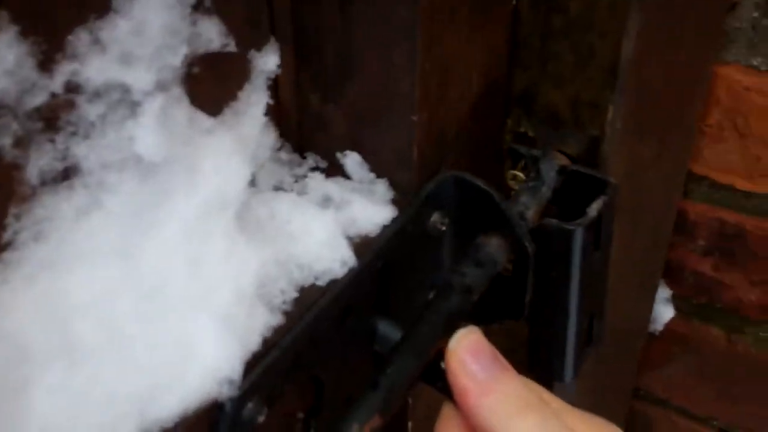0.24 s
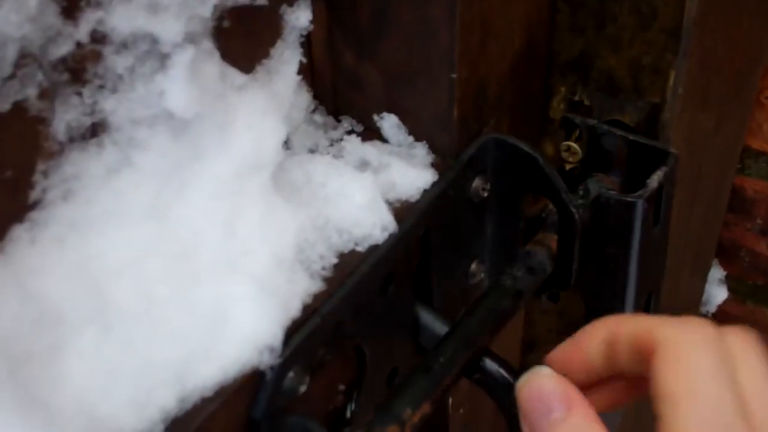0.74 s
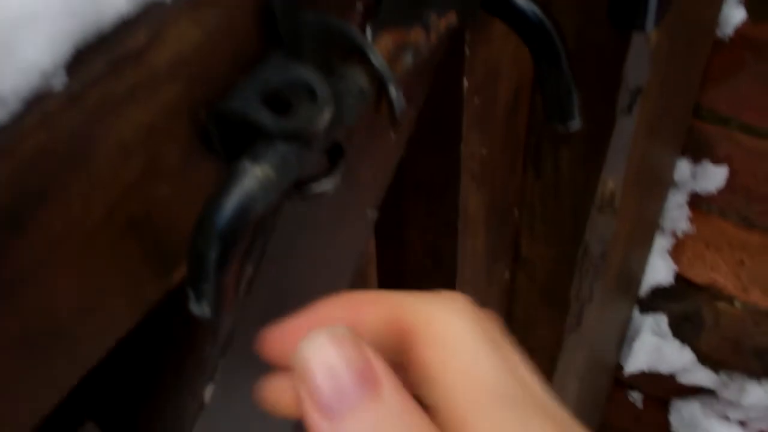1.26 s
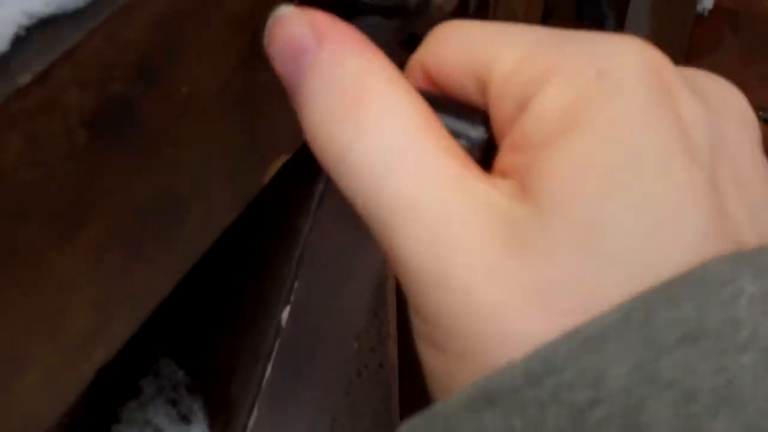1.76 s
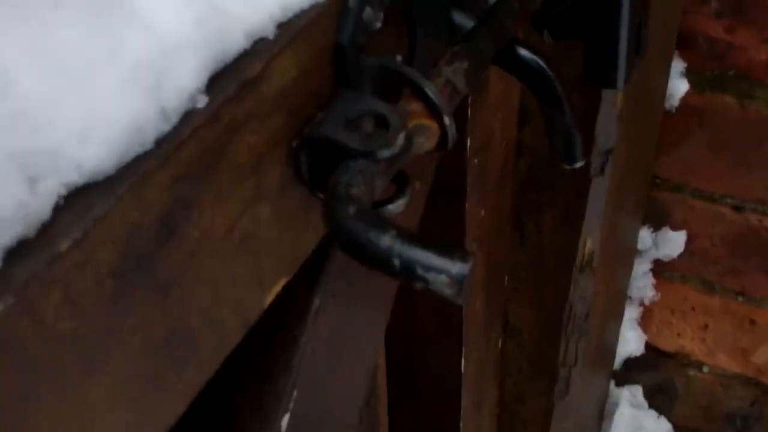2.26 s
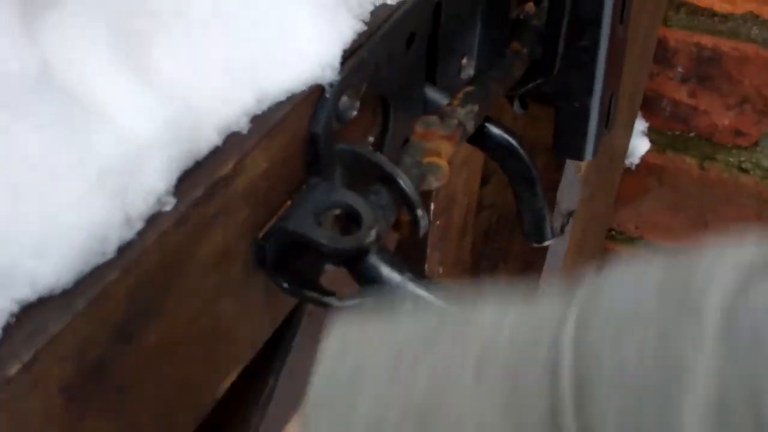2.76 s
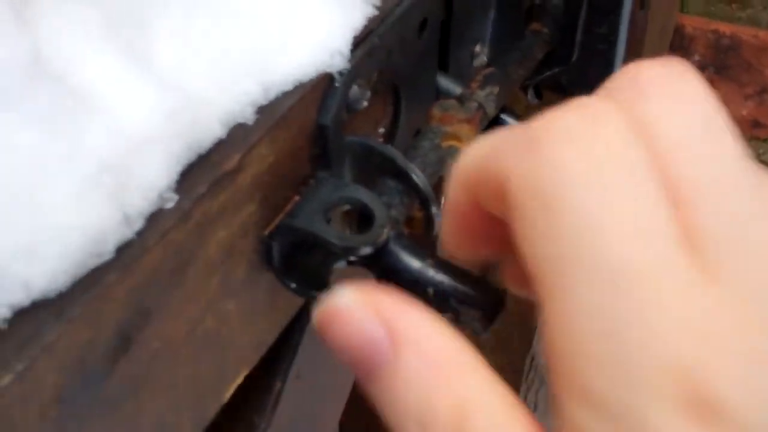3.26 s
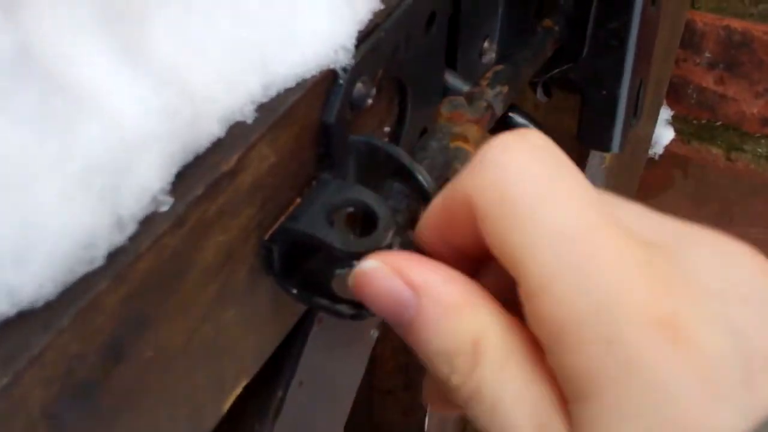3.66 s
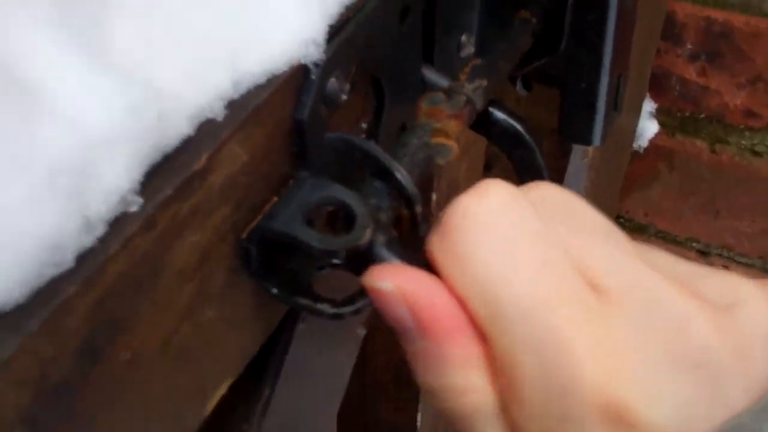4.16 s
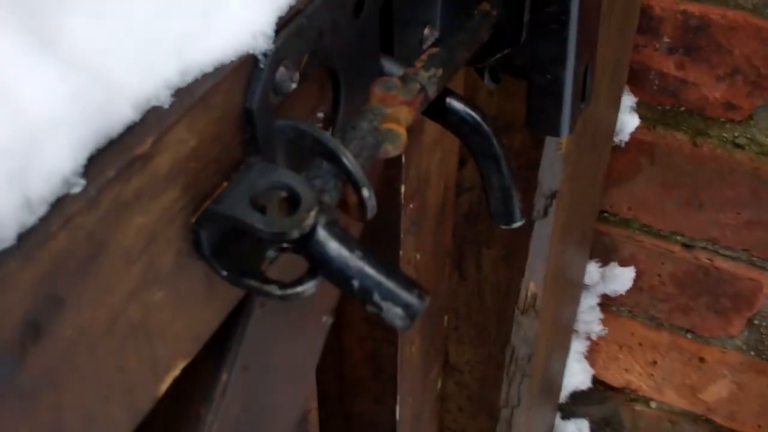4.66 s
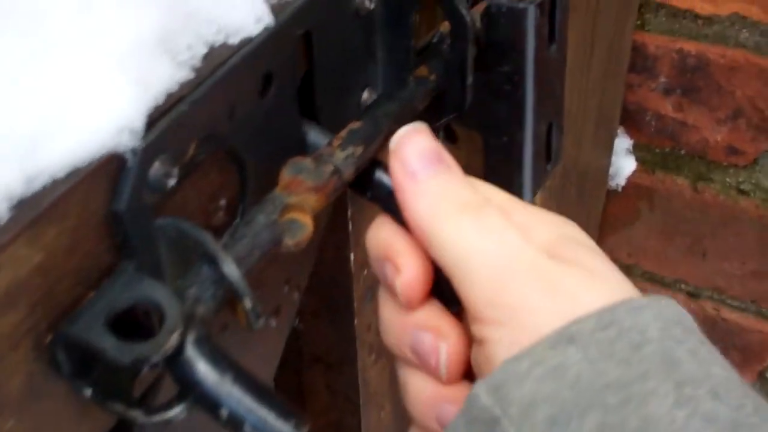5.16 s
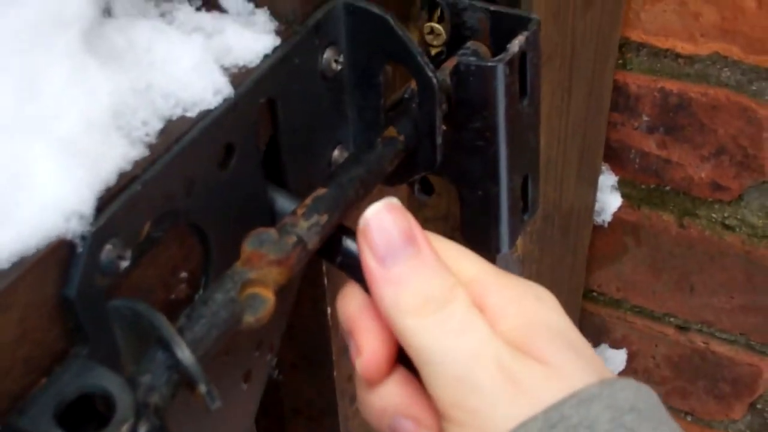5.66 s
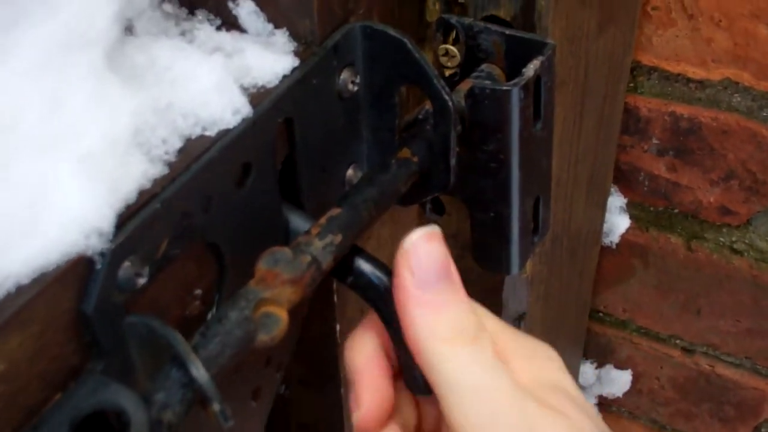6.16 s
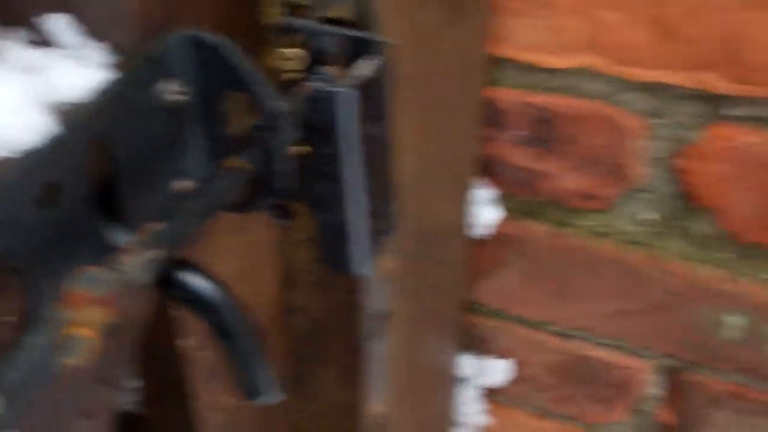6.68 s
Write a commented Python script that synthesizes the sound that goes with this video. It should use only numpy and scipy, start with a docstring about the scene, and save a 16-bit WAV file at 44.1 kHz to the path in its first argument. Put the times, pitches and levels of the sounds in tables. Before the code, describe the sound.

Sharp metal knocks, short gritty bolt scrapes and a dull gate drag, very close and dry outdoors, with faint traffic wash pumping behind.

```python
"""A hand works the iron latch and slide bolt of a wooden gate, close by, over a distant traffic hum.
From the start iron knocks shake plate and boards (decaying modes), with bolt scrapes between (dense slips).
The hum (shaped noise) drops at once, swells back, and repeats this at listed times; faint whistles come and go.
The gate bumps its post from 0.2 s on and drags with dull catches from 1.2 to 1.6 s (slips over a noise rush).
The free bolt rings thinly near 1.7, 2.5 and 6.2 s (damped sines); knocks and scrapes go on to 6.9 s."""
import sys
import numpy as np
from scipy import signal
from scipy.io import wavfile
from scipy.ndimage import uniform_filter1d

SR = 44100
rng = np.random.default_rng(int(sys.argv[2]) if len(sys.argv) > 2 else 0)


def master_out(mix):
    """Clip the mix to full scale and print it as 16-bit PCM to the path in sys.argv[1]."""
    frames = np.transpose(np.atleast_2d(mix))
    ceiling = np.clip(frames, -1, 1)
    pcm = np.round(ceiling * 32767).astype(np.int16)
    wavfile.write(sys.argv[1], SR, pcm)


N = 305171


def gain_of(db):
    """Decibels to amplitude."""
    return 10 ** (np.asarray(db) / 20)


def evened(x):
    """Scales to rms 1."""
    return x / np.sqrt(np.mean(x ** 2) + 1e-20)


def peaked(x):
    """Scales to peak 1."""
    return x / abs(x).max()


def read(points, hz):
    """Interpolates a spectrum table on a log frequency axis."""
    point_hz, value = np.transpose(points)
    return np.interp(np.log(hz + 1), np.log(point_hz + 1), value)


def add(mix, start_s, sound, pan_db):
    """Adds a two-channel sound at start_s, the left raised against the right by pan_db."""
    part = mix[:, round(start_s * SR):][:, :sound.shape[1]]
    panned = sound * gain_of([[pan_db / 2], [-pan_db / 2]])
    part += panned[:, :part.shape[1]]


# Left-right likeness of noise. Each row: frequency in Hz, correlation 0 to 1.
LIKENESS = [(60, 0.59), (130, 1), (280, 1), (590, 0.85), (1260, 0.78), (2700, 0.27), (5790, 0.45),
            (12400, 0.02)]
# Left-right balance of noise. Each row: frequency in Hz, left against right in dB.
BALANCE = [(60, 4.5), (110, 1), (200, 4.5), (350, 3), (640, 4), (1160, 0.5), (2100, 3), (3790, 4.5),
           (6860, 5.5), (12400, 4)]


def noise(spectrum, patchy_db, size):
    """Random short-time spectra with drifting patches, partly alike at two microphones, rms 1."""
    frames, hz = 4 * N // size + 5, np.fft.rfftfreq(size, 1 / SR)
    a, b, c, d, patches = rng.standard_normal((frames, len(hz), 5)).T
    patches = uniform_filter1d(patches, 10, 0)
    patches = evened(uniform_filter1d(patches, 12, 1))
    same = np.clip(read(LIKENESS, hz), -1, 1)[:, None]
    left = a + 1j * b
    right = same * left + np.sqrt(1 - same ** 2) * (c + 1j * d)
    ear_db = np.array([.5, -.5])[:, None, None] * read(BALANCE, hz)[:, None]
    level_db = read(spectrum, hz)[:, None] + patchy_db * patches + ear_db
    bins = np.array([left, right]) * gain_of(level_db)
    return evened(signal.istft(bins, nperseg=size, noverlap=size * 3 // 4)[1][:, :N])


# Fuzzy background whistles. Each row: start in seconds, end in seconds, centre in Hz, width in Hz,
# level against the wash in dB.
WHISTLES = [(0.95, 1.25, 4680, 110, -11), (0.952, 1.198, 5570, 120, -14), (2.1, 3.8, 1820, 170, -8),
            (4.399, 5.08, 1740, 120, -15), (4.55, 5.08, 620, 40, -16), (6.35, 6.8, 640, 40, -16)]


def whistles():
    """Narrow resonances filter noise into bands that fade in and out."""
    out = np.zeros((2, N))
    for start_s, end_s, hz, width_hz, db in WHISTLES:
        hiss = rng.standard_normal((3, N))[:, :round((end_s - start_s) * SR)]
        shared = hiss[:2] + 2.6 * hiss[2]
        band = signal.lfilter(*signal.iirpeak(hz, hz / width_hz, SR), shared)
        fade = signal.windows.tukey(band.shape[1], .3)
        add(out, start_s, gain_of(db) * evened(band) * fade, 4)
    return out


# Dips of the traffic hum. Each row: start in seconds, depth of the wash in dB, depth of the rumble in dB.
DIPS = [(0, 67, 20), (.2, 23, 7.5), (.46, 18, 8), (.54, 28, 20), (0.656, 25, 18.5), (.945, 7, -7),
        (1.608, 15, 6), (1.769, 23.5, 12), (2.49, 31.5, 24), (2.821, 20, 12), (3.36, 6, 1),
        (3.766, 11, 1.5), (4.2, 15, -0.5), (4.307, 23, 7), (5.096, 39.5, 29.5), (5.36, 18.5, 15.5),
        (5.47, 31.5, 21), (5.59, 24.5, 27), (5.72, 38.5, 38), (5.87, 29.5, 22), (5.99, 36, 23.5),
        (6.091, 18, 24), (6.277, 29.5, 24.5)]
SINK_S, SAG_S, SAG_SHARE = 0.0096, 0.074, 0.26  # quick drop, slower sag
HOLD_S, SWELL_S = 0.13, 0.12


def dips():
    """Exponential drop, hold and recovery in dB; the deepest dip rules."""
    t, depth = np.arange(N) / SR, np.zeros((2, N))
    for start_s, *depth_db in DIPS:
        since = np.maximum(t - start_s, 0)
        drop = (1 - SAG_SHARE) * np.exp(-since / SINK_S)
        sag = SAG_SHARE * np.exp(-since / SAG_S)
        swell = np.exp(-np.maximum(since - HOLD_S, 0) / SWELL_S)
        depth = np.maximum(depth, np.outer(depth_db, (1 - drop - sag) * swell))
    return -depth


# Spectrum of the distant wash. Each row: frequency in Hz, density in dB per Hz.
WASH = [(53, -39.5), (90, -7.5), (128, -1), (276, -7.5), (393, -3.5), (474, -7.5), (608, -10.5),
        (1230, -14.5), (1790, -13.5), (2490, -15), (4190, -18.5), (6090, -25), (7980, -25), (10900, -31.5),
        (12900, -45), (16700, -67.5), (22000, -120)]
# Spectrum of the distant rumble. Each row: frequency in Hz, density in dB per Hz.
RUMBLE = [(15, -47.5), (25, -7.5), (41, -4.5), (54, 1.5), (65, -2.5), (81, -16), (100, -7), (130, -39),
          (220, -120)]
WASH_DB, RUMBLE_DB = -50, -53.5  # before dips
HISS_DB = -85  # floor under the wash
HUM_HZ, HUM_SHARE = 55.8, .6  # steady hum, amplitude against rumble rms


def street():
    """Distant traffic: wash with whistles, and rumble with a steady hum, both under the dips."""
    wash_dip_db, rumble_dip_db = dips()
    hum = HUM_SHARE * np.sin(2 * np.pi * HUM_HZ * np.arange(N) / SR) * gain_of([[2], [-2]])
    wash_gain = np.hypot(gain_of(WASH_DB + wash_dip_db), gain_of(HISS_DB))
    wash = wash_gain * (noise(WASH, 1.6, size=1024) + whistles())
    rumble = noise(RUMBLE, 0.38, size=8192) + hum
    return wash + gain_of(RUMBLE_DB + rumble_dip_db) * rumble


def wall(x):
    """The brick wall and boards throw back a short dull scatter: decaying low-passed noise taps."""
    t = np.arange(5000) / SR
    taps = rng.standard_normal((2, len(t))) * gain_of(-60 * t / 0.18) * (t > .003)
    taps = signal.lfilter(*signal.butter(2, 2500, fs=SR), taps)
    return signal.fftconvolve(x, taps / np.linalg.norm(taps[0]), axes=1)[:, :N]


# The gate bumps its post. Each row: start in seconds, level in dB, pitch in Hz, t60 in seconds.
THUDS = [(0.219, -38, 87, 0.078), (2.421, -13.5, 131, 0.028), (2.797, -33.5, 110, 0.18),
         (3.35, -38, 152, 0.085), (4.16, -37, 179, .1)]


def thuds():
    """A low push through the gate: one decaying sine per bump."""
    out, t = np.zeros((2, N)), np.arange(4000) / SR
    for start_s, db, hz, t60_s in THUDS:
        push = -gain_of(db - 60 * t / t60_s) * np.sin(2 * np.pi * hz * t)
        add(out, start_s, push * np.ones((2, 1)), 4.5)
    return out


# The dragging gate catches. Each row: start in seconds, peak in dB, pitch in Hz.
CATCHES = [(1.219, -41, 466), (1.343, -52, 300), (1.356, -31, 410), (1.374, -28, 840), (1.388, -36.5, 296),
           (1.4, -30.5, 700), (1.432, -27, 697), (1.449, -27.5, 880), (1.465, -39, 738), (1.474, -31, 479),
           (1.488, -39.5, 303), (1.504, -32, 855)]
CATCH_T60_S = 0.0087


def catches():
    """Short dull pulses through the boards: three inharmonic decaying sines each."""
    out, t = np.zeros((2, N)), np.arange(1500) / SR
    for start_s, db, hz in CATCHES:
        tones = np.sin(2 * np.pi * hz * t)
        tones += 0.5 * np.sin(2 * np.pi * 0.41 * hz * t)
        tones += 0.3 * np.sin(2 * np.pi * 2.5 * hz * t)
        pulse = peaked(gain_of(-60 * t / CATCH_T60_S) * tones)
        add(out, start_s, gain_of(db) * pulse * np.ones((2, 1)), 4.5)
    return out


SCATTER_DB = 1.6  # spread per unit of chance


def ring(modes, chance, side):
    """Decaying modes; the contact point scatters their strength, and two microphones hear other phases."""
    t, (pan_db, scatter_rad) = np.arange(4000) / SR, side
    hz, db, t60_s = np.transpose(modes)[:, :, None]
    strength, detune, turn = chance[:3 * len(modes)].reshape(3, -1, 1)
    onset = 1 - np.exp(-t * hz * 0.72)
    decay = gain_of(db + SCATTER_DB * strength - 60 * t / t60_s) * onset
    phase = 2 * np.pi * hz * (1 + 0.021 * detune) * t
    ears = []
    for ear in (1, -1):
        tones = decay * np.sin(phase + ear * scatter_rad * turn)
        ears.append(gain_of(ear * pan_db / 2) * tones.sum(0))
    return np.array(ears)


# Modes of wood and iron: boards, low plate, plate, treble, bright edge.
# Each row: frequency in Hz, relative level in dB, nominal t60 in seconds.
BOARDS = [(165.5, -9, 0.073), (194.6, -6.5, 0.1), (263.6, 5.5, 0.025), (348, 1.5, 0.034),
          (420.7, -2, 0.034), (560, 7, 0.015)]
LOW_PLATE = [(842.5, -2.8, 0.013), (984.6, 1, 0.016), (1145, 0.89, 0.015), (1385, -1.6, 0.012)]
PLATE = [(1585, -11, 0.006), (1756, -12, 0.01), (2023, -3.5, 0.0068), (2520, -5, 0.0048)]
TREBLE = [(2560, -0.5, 0.0094), (2880, -0.5, 0.012), (3290, -3, 0.014), (3985, -8, 0.013),
          (4320, 2.5, 0.0065), (4740, -2.5, 0.0086), (5120, 5.5, 0.0066), (5770, 5.5, 0.0054)]
EDGE = [(6500, 8, 0.0036), (7270, -0.5, 0.0047), (8250, 4, 0.0023), (9260, -6.5, 0.0051),
        (9850, -16.5, 0.0036)]
# Stereo of the five mode groups in that order. Each row: left against right in dB, phase scatter in radians.
SIDES = [(4, 0.059), (4.5, 0.2), (5, 0.2), (5.5, 0.28), (8, 0.94)]


def scrape(rows):
    """Dense small slips of uneven size excite the same iron and wood as the knocks."""
    s, *columns = np.transpose(rows)
    t = np.arange(s[0], s[-1], 1 / SR)
    db, boards_db, treble_db = (np.interp(t, s, column) for column in columns)
    out = np.zeros((2, len(t)))
    # the grip on the rust comes and goes
    grip = gain_of(1.4 * evened(uniform_filter1d(rng.standard_normal(len(t)), 250)))
    groups = ((LOW_PLATE, 0, 350, SIDES[1]), (PLATE, -5., 1500, SIDES[2]),
              (BOARDS, boards_db, 300, SIDES[0]), (TREBLE + EDGE, treble_db, 5000, SIDES[4]))
    for modes, group_db, slips_per_s, side in groups:
        struck = rng.random(len(t)) < slips_per_s / SR
        size = gain_of(1.5 * np.minimum(rng.exponential(1, len(t)), 4))
        slips = struck * size * rng.choice([-1, 1], len(t))
        pressed = np.array(modes) * [1, 1, .55]  # pressed parts ring shorter
        body = ring(pressed, 0.14 * rng.standard_normal(39), side)
        sound = signal.fftconvolve(body, (slips * grip)[None])[:, :len(t)]
        out += gain_of(db + group_db) * evened(sound)
    return s[0], out * signal.windows.tukey(len(t), .15)


# The gate drags open. Each row: time in seconds, slips in dB, boards against them in dB,
# treble against them in dB, rush in dB.
DRAG = [(1.2, -74, -5, -19, -53.5), (1.26, -52.5, -18, 0.5, -53.5), (1.33, -54.5, -15, 7.5, -45),
        (1.39, -59, 8, 10.5, -41.5), (1.46, -56.5, 11.5, 10, -38), (1.528, -42.5, 3, -1, -48.5),
        (1.599, -78.5, 8.5, -28, -52)]
# Spectrum of the drag's rush. Each row: frequency in Hz, density in dB per Hz.
RUSH = [(47, -36), (80, -12), (133, -8), (457, -1), (498, -3), (730, 1), (1350, -15), (6510, -19),
        (9960, -25), (12900, -37.5), (16700, -74.5), (22000, -120)]


def drag():
    """Slips on rust and wood over a patchy noise rush."""
    s, *slips, rush_db = np.transpose(DRAG)
    t = np.arange(N) / SR
    surge_db = 2.9 * evened(uniform_filter1d(rng.standard_normal(N), 220))  # it sticks and slips
    level_db = np.interp(t, s, rush_db, -120, -120) + surge_db
    out = gain_of(level_db) * noise(RUSH, 4.0, size=256)
    add(out, *scrape(np.transpose([s, *slips])), 0)
    return out


# Bolt scrapes, and short low rumbles through the boards. Each row: start in seconds, loudest in seconds, end in
# seconds, level in dB, # boards against it in dB, treble against it in dB.
SCRAPES = [(0, -0.002, 0.11, -65, 10.5, -2), (0.214, 0.215, .33, -75, 18.5, 1),
           (0.471, 0.507, .524, -40.5, -3, -27), (1.948, 2.024, 2.09, -55.5, 1, 1),
           (2.442, 2.459, 2.502, -29.5, -11.5, -2), (2.823, 2.835, 2.92, -76, 27.5, -17),
           (4.096, 4.177, 4.2, -59.5, 14, -0.5), (5.34, 5.347, 5.39, -63.5, 10, -15.5),
           (6.499, 6.623, 6.74, -58, -1.5, 4.5), (6.803, 6.846, 6.89, -46.5, 0, 6.5),
           (6.871, 6.914, 6.92, -45, 5.5, -0.5)]
RISE_DB, FALL_DB = -24, -23  # start and end against the loudest moment


def scrapes():
    """The bolt slides and the boards rumble briefly: slips swell to a loudest moment and fade."""
    out = np.zeros((2, N))
    for start_s, loudest_s, end_s, db, *colour in SCRAPES:
        rows = [(start_s, db + RISE_DB, *colour), (loudest_s, db, *colour), (end_s, db + FALL_DB, *colour)]
        add(out, *scrape(rows), 0)
    return out


# Free bolt rod modes. Each row: frequency in Hz, t60 in seconds.
ROD = [(5868, 0.17), (8247, .07), (9270, 0.15), (9415, 0.28), (11200, 0.084), (11680, .07)]
# Rings of the rod. Each row: struck in seconds, touched in seconds, change at the touch in dB,
# then the level of each rod mode in dB.
RINGS = [(1.73, 1.784, -38, -67, -69, -72, -41.5, -70, -64),
         (2.451, 2.497, -26, -32, -39, -42.5, -59, -56, -66),
         (6.243, 6.288, -16, -34.5, -33, -38.5, -60.5, -46.5, -49.5)]


def rod():
    """The free bolt rings in thin clean decaying sines until a touch damps it."""
    out, t = np.zeros((2, N)), np.arange(8000) / SR
    hz, t60_s = np.transpose(ROD)[:, :, None]
    for struck_s, touched_s, lost_db, *db in RINGS:
        touch_db = lost_db * np.clip((t - (touched_s - struck_s)) / 0.01, 0, 1)
        level = gain_of(np.array(db)[:, None] - 60 * t / t60_s + touch_db)
        ears = [(level * np.sin(2 * np.pi * hz * t + lag_rad)).sum(0) for lag_rad in (0, 1.2)]
        add(out, struck_s, np.array(ears), 6.5)
    return out


LEAD_DB, LEAD_OCTAVES = 11, .16


def led(modes, lead_hz):
    """Lifts the modes near the leading pitch with a Gaussian on a log frequency axis."""
    hz, db, t60_s = np.transpose(modes)
    octaves = np.log2(hz / lead_hz)
    return np.transpose([hz, db + LEAD_DB * np.exp(-(octaves / LEAD_OCTAVES) ** 2), t60_s])


# Knocks. Each row: start in seconds, blow strength in dB, then against it boards, low plate and treble in dB,
# nominal t60 of the gritty contact in seconds.
KNOCKS = [(0.0004, -31, -2.5, 0, 3.5, 0.018), (0.053, -65, 11, 8, 2, 0.022),
          (0.216, -40.5, 1.5, -1, -5, 0.025), (0.2491, -53.5, 3, 2, 2, 0.035),
          (0.272, -61, -1, -11, 7, .02), (0.281, -43, -9, -24, 2, 0.025), (0.3015, -63, -5, -6, 8, 0.061),
          (0.335, -61, -9, -4, 4, 0.03), (0.4441, -19, -11, 2, 4.5, 0.014),
          (0.4994, -38, -12.5, 0, 2, 0.015), (0.5071, -53, -19, 23, -16, .01),
          (0.5228, -32.5, -6, 9, 11.5, 0.028), (0.5257, -18.5, -15.5, -36, 3.5, 0.014),
          (0.5824, -61, 7, 12.5, -17, 0.08), (0.63, -45.5, -30, 11, -21, 0.047),
          (0.642, -33.5, -6, 2.5, 12.5, 0.019), (0.655, -37, -5, 5.5, -1, 0.025),
          (0.6908, -57, 3, 16, -11, 0.0093), (0.724, -69.5, 17, 13.5, -14, 0.0078),
          (0.7516, -77, 0, 18.5, -3, .017), (0.9305, -43, -11, 14, 5, 0.013),
          (0.933, -20, -9.5, -14, 5, 0.02), (1.114, -41, 4, 8, -2, 0.045), (1.2527, -37, 5, 4.5, -10, 0.03),
          (1.2642, -38.5, 3, -17, -13, 0.028), (1.526, -18.5, -23, 3, 2, 0.016),
          (1.596, -21, -10, -1, -9, 0.028), (1.6844, -41.5, 1, 5, -4, 0.075),
          (1.734, -22, -5, 1.5, -4.5, 0.038), (1.7468, -16, -17, -8.5, -1, 0.0099),
          (1.7896, -37, 2, 1, -3.5, 0.0085), (1.9215, -46, 5, 3.5, -16, 0.047),
          (2.418, -32.5, -11.5, -7.5, 3, .02), (2.423, -17.5, -4.5, 0, -3.5, 0.052),
          (2.4289, -21.5, -29, -30, 5, 0.042), (2.4421, -20.5, -15, -1.5, 3.5, 0.01),
          (2.469, -18, -29, -26, -9, 0.021), (2.489, -28.5, -12.5, -6.5, -4, 0.024),
          (2.789, -39, 1.5, -10, -6.5, .03), (2.7953, -10.5, -17, -8.5, -6, 0.018),
          (2.8019, -31.5, 11.5, 13.5, -2, 0.0074), (2.8277, -25, -7, -3, -9.5, 0.013),
          (3.197, -46.5, 2, 1, 0.5, 0.023), (3.2819, -41, 8.5, 6.5, -5, 0.012),
          (3.3054, -32.5, -3, 5, -2, 0.018), (3.3148, -20, -4, -1.5, -2.5, 0.015),
          (3.3463, -27, 0, 1, 1.5, 0.014), (3.7535, -12, -9.5, -3.5, -14, 0.0049),
          (3.7885, -53.5, 14, 22, -18, 0.0059), (3.8494, -58.5, 22.5, 23, -15, 0.019),
          (3.874, -61, -10, -10, 8.5, .012), (3.9578, -36, 5.5, 9.5, -24, 0.019),
          (4.024, -54, 14, 5, -12, 0.017), (4.1968, -11.5, -16, -0.5, -6.5, 0.008),
          (4.2537, -15.5, -15, 0, -12, 0.012), (4.2666, -19, -6, -10, -4, 0.012),
          (4.286, -33.5, 0.5, 7.5, 6, 0.02), (4.3022, -20.5, -11.5, -4.5, -7.5, 0.011),
          (4.369, -61.5, 12, 8, -15, 0.017), (4.4737, -57, 9.5, 13.5, -4, 0.034),
          (4.5077, -52.5, 11.5, 10.5, -2, .022), (4.605, -53, 11, 13.5, -13, 0.0085),
          (5.08, -23.5, -20, -4, -4, 0.023), (5.0873, -14, -35, -7.5, -2, 0.019),
          (5.093, -35.5, -23, -9, 14.5, 0.015), (5.1475, -51.5, 2, 5, -14, 0.019),
          (5.3298, -27, -22, -5.5, 3.5, .018), (5.3373, -31, -6.5, -3.5, 7, 0.023),
          (5.343, -26.5, -7, -6.5, -3, 0.025), (5.443, -19.5, -27, -17, 1.5, 0.011),
          (5.454, -27, -13.5, 0, 8.5, 0.012), (5.5777, -40.5, 0, 0.5, 4.5, 0.031),
          (5.597, -47.5, -5.5, -5, -3, 0.019), (5.7019, -21.5, -32.5, -10.5, 3.5, 0.014),
          (5.711, -30.5, -11, -14, 7, 0.025), (5.798, -57.5, -16, -15.5, -15, 0.024),
          (5.815, -64.5, -19.5, -12, -2, .012), (5.8394, -46.5, -4, -2, 1.5, 0.027),
          (5.858, -48.5, -14.5, -12, -1.5, 0.01), (5.954, -41.5, -11, -10, -11, 0.028),
          (5.9695, -29.5, -10, -5, 10.5, 0.014), (6.074, -45.5, -3, 0, 7, 0.02),
          (6.083, -45, -5, -4, -3.5, 0.018), (6.1538, -58, -3, 4, 2, .026),
          (6.238, -18, -42, -15, 2, 0.011), (6.249, -31, -35, -12.5, -0.5, 0.075),
          (6.6045, -44.5, -19, 5, 5.5, 0.022), (6.8012, -46, 5.5, -4, -12, 0.016),
          (6.822, -33, -5.5, 6.5, 0.5, 0.034), (6.9022, -34, -22, 4.5, 1, 0.13)]
# Where the iron is held and struck decides which modes lead. Each row: start in seconds,
# leading pitch of low plate, plate and treble in Hz.
HOLDS = [(0, 1100, 1870, 4440), (0.67, 1390, 1750, 3600), (0.85, 1146, 1830, 3040), (1.05, 830, 1640, 2430),
         (1.56, 790, 1600, 4000), (2.2, 1010, 1770, 4700), (2.65, 872, 1520, 1920), (3.33, 826, 1400, 2500),
         (3.6, 885, 1780, 2300), (5.25, 805, 1780, 2440), (5.92, 840, 1630, 4800), (6.03, 800, 1650, 2530)]
# Bright edge by spell of handling. Each row: time in seconds, offset against the edge rule in dB.
EDGE_SPELLS = [(0, -4.5), (1, -16.5), (1.5, -1.5), (2.9, -1), (3.3, 5.5), (4.22, -1), (4.27, 2), (5, -0.5),
               (6.9, -1.5)]
EDGE_DB, EDGE_DB_PER_TREBLE_DB = -1.5, 1.89  # edge rule: follows the treble, more steeply
CONTACT_SHARES = (0.94, 1.5, 1.84, 1.0, 1.08)  # contact t60 factor, boards to edge


def knocks():
    """Rusty iron meets in one sharp tick and a short gritty burst of contacts that drive all the modes."""
    out, t = np.zeros((2, N)), np.arange(2000) / SR
    chance = rng.standard_normal((len(KNOCKS), 5, 24))
    grit = rng.standard_normal((len(KNOCKS), len(t)))
    tick = 4.22 * np.exp(-((t - .0006) / .00003) ** 2)
    onset = 1 - np.exp(-t / 0.00055)
    for (start_s, db, boards_db, low_db, treble_db, t60_s), draws, g in zip(KNOCKS, chance, grit):
        spell_db = np.interp(start_s, *np.transpose(EDGE_SPELLS))
        edge_db = EDGE_DB + EDGE_DB_PER_TREBLE_DB * treble_db + spell_db
        levels_db = boards_db, low_db, 0, treble_db, edge_db
        begun = [hold[1:] for hold in HOLDS if hold[0] <= max(start_s, HOLDS[0][0])]
        low_hz, plate_hz, treble_hz = begun[-1]
        groups = BOARDS, led(LOW_PLATE, low_hz), led(PLATE, plate_hz), led(TREBLE, treble_hz), EDGE
        body = 0
        for modes, group_db, share, draw, side in zip(groups, levels_db, CONTACT_SHARES, draws, SIDES):
            decay = gain_of(-60 * t / np.clip(t60_s * share, .003, .1))
            contact = tick + g * abs(g) / 2 * decay * onset
            sound = signal.fftconvolve(ring(modes, draw, side), contact[None])
            body = body + gain_of(group_db) * peaked(sound)
        add(out, start_s, gain_of(db) * body, 0)
    return out


def scene():
    """Latch, bolt and gate close by with their wall scatter, street behind."""
    gate = thuds() + catches() + drag() + scrapes() + rod() + knocks()
    return street() + gain_of(-37.0) * wall(gate) + gate


MIC_LOW_HZ, MIC_TOP_HZ, BAND_LIMIT_HZ = 36.3, 11900, 16000


def record(dry):
    """Small microphones lose deepest bass and top treble; loud peaks round off; then the band limit."""
    heard = signal.sosfilt(signal.butter(2, MIC_LOW_HZ, "high", fs=SR, output="sos"), dry)
    heard = signal.sosfilt(signal.butter(N=5, Wn=MIC_TOP_HZ, fs=SR, output="sos"), heard)
    soft = 0.43 * np.tanh(heard / 0.36)
    band_limit = signal.firwin(511, BAND_LIMIT_HZ, window=("kaiser", 9), fs=SR)
    return signal.oaconvolve(soft, band_limit[None], "same")


dry = scene()
out = record(dry)
master_out(out)
```